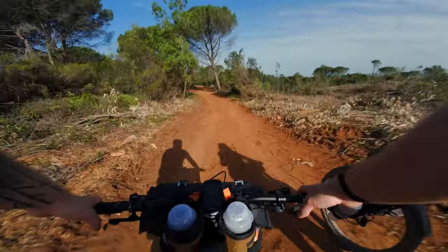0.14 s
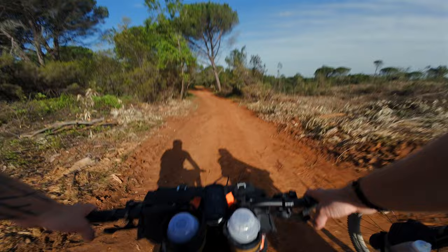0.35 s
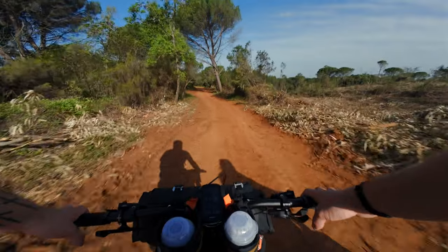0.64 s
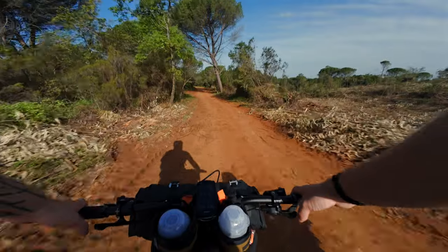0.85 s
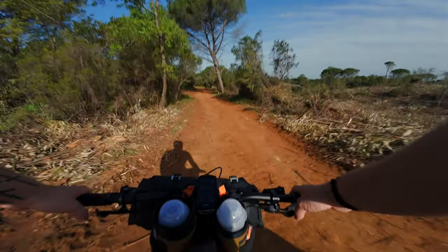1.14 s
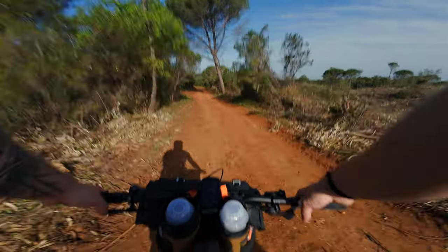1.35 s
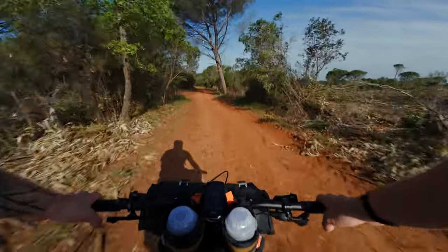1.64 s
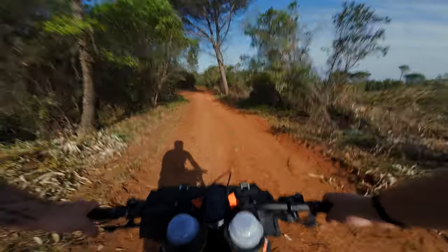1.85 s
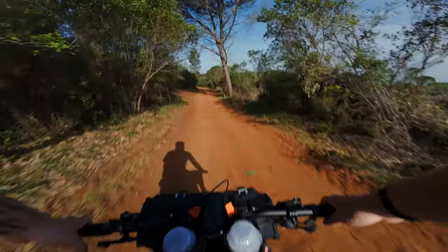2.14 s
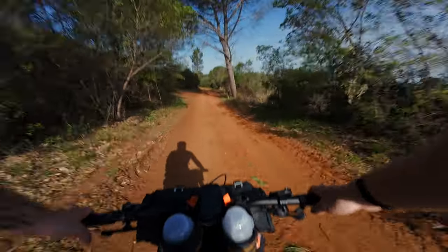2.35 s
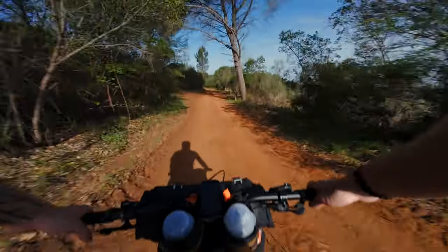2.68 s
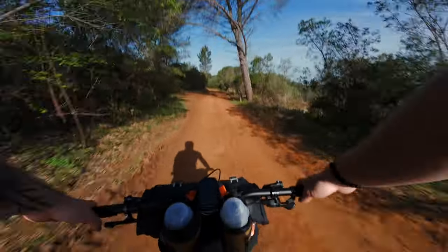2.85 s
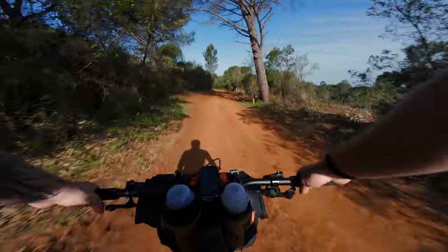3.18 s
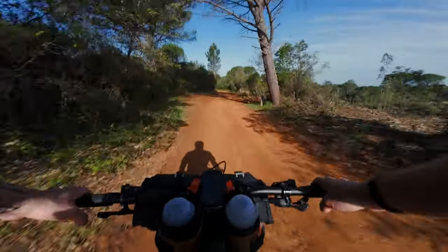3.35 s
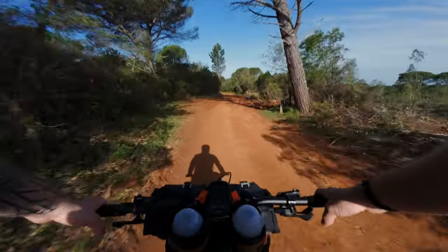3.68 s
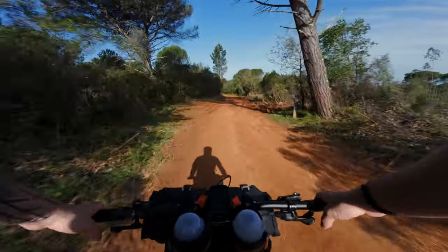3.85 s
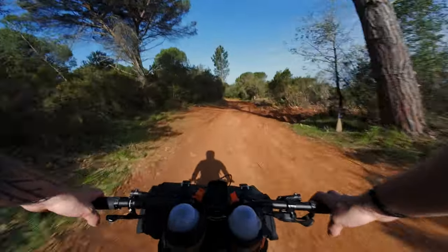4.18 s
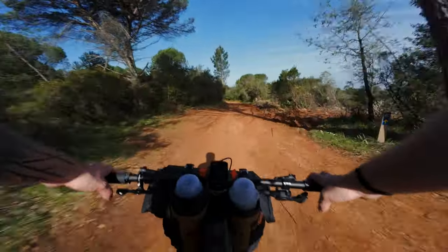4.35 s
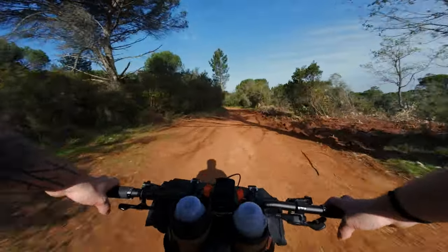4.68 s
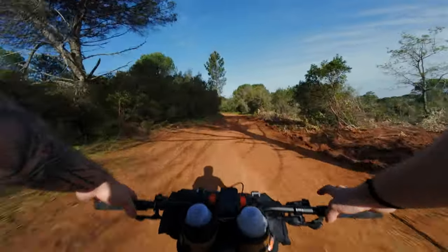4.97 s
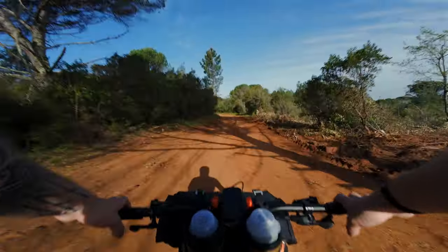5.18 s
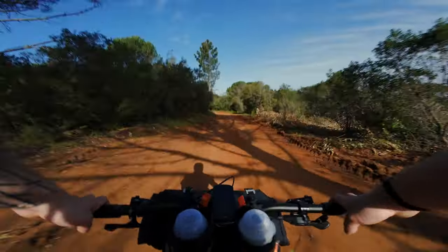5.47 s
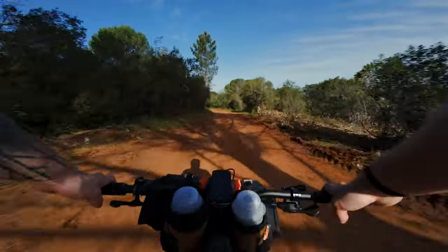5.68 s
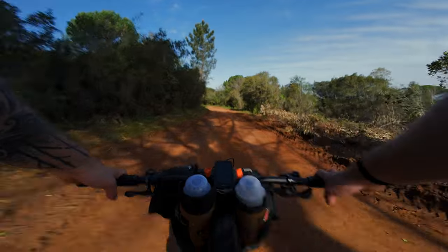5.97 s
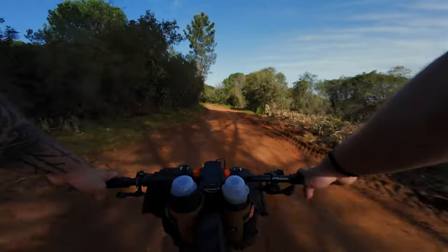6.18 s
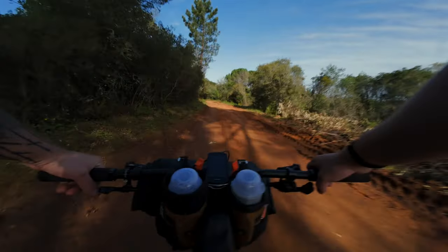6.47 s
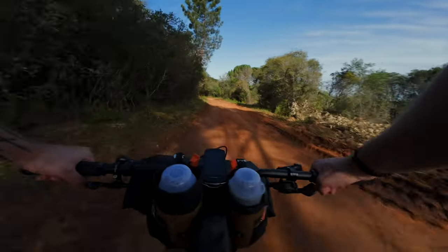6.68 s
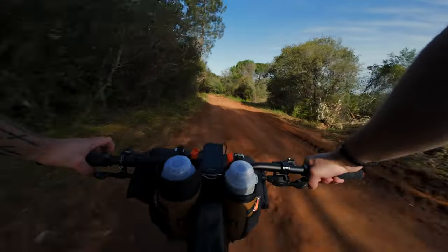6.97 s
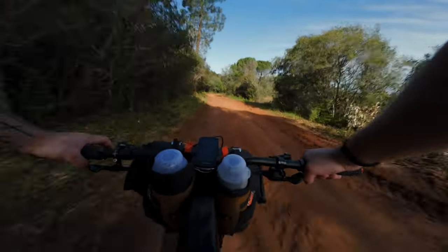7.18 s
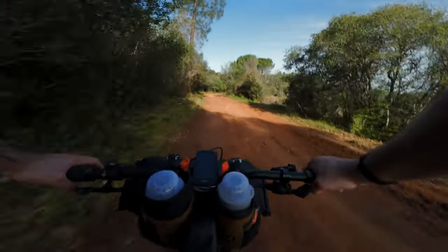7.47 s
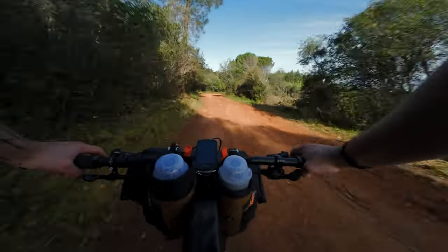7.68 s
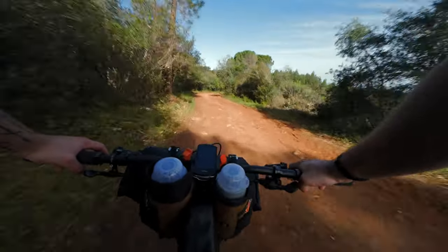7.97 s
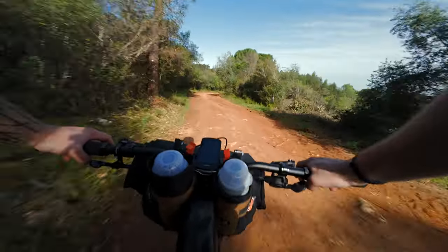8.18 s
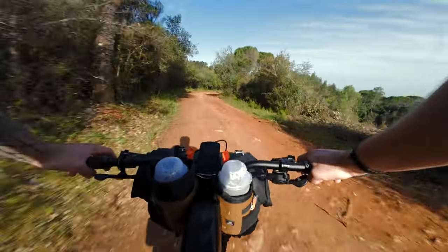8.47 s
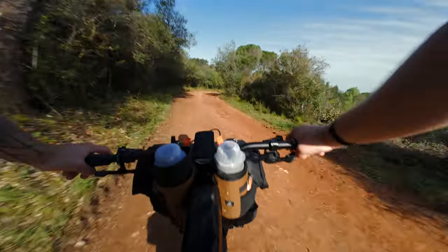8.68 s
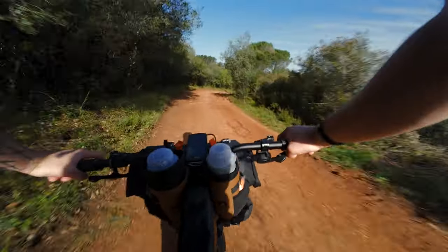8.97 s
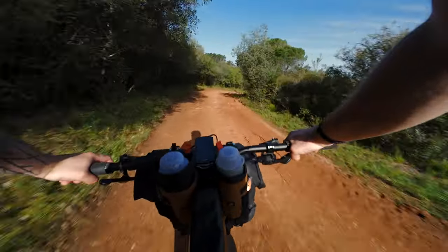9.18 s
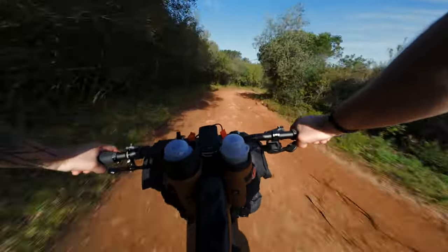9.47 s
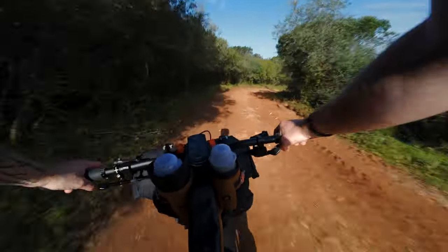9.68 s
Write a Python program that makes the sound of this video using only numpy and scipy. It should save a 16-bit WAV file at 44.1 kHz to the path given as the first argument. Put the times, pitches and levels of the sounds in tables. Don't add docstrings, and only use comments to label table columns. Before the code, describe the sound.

A loaded bicycle rumbles along a rough dirt track, grit crunching and small stones ticking off the frame while wind buffets the microphone.

```python
import sys
import numpy as np
from scipy import signal
from scipy.fft import rfft, irfft, next_fast_len
from scipy.io import wavfile
from scipy.ndimage import uniform_filter1d, map_coordinates

SR = 44100
rng = np.random.default_rng(int(sys.argv[2]) if len(sys.argv) > 2 else 0)


def level_to_linear(level):
    exponent = np.asarray(level, float) / 20
    return 10 ** exponent


def generate_wav(signal):
    frames = np.transpose(np.atleast_2d(signal))
    scaled = np.clip(frames, -1, 1) * 32767
    pcm = np.round(scaled).astype(np.int16)
    wavfile.write(sys.argv[1], SR, pcm)


N = 433503

# t/s, level/dB
WIND = [(0.0, -34), (0.15, -28.5), (0.75, -29), (1.15, -31), (1.45, -28.5), (1.7, -29.5), (2.65, -26.5),
        (2.9, -27.5), (3.42, -31), (4.2, -30), (4.62, -33.5), (5.61, -27), (6.1, -28.5), (7.4, -28.5),
        (7.61, -30.5), (8.1, -26), (8.6, -28), (9.83, -26.5)]
# f/Hz, level/dB
BUFFET = [(3, -70), (12, -2.5), (23, -6), (31, -5), (60, -9), (110, -20.5), (170, -24.5), (300, -24),
          (600, -114), (1500, -140)]
# t/s, peak level/dB, width/ms
GUSTS = [(0.177, -15, 8.7), (0.388, -10.5, 6.0), (0.424, -15, 15), (0.47, -14, 18), (0.726, -18, 11),
         (1.299, -14.5, 7.3), (1.403, -12.5, 8.6), (1.497, -10, 6.6), (1.567, -11.5, 9.3),
         (1.889, -12, 5.9), (1.924, -14, 20.0), (1.969, -14, 4.3), (2.07, -11.5, 6.8), (2.109, -15, 20),
         (2.15, -13, 5.4), (2.244, -9.5, 8.3), (2.275, -19, 15), (2.306, -12, 3.2), (2.38, -10.0, 11),
         (2.45, -15, 3.4), (2.528, -7.5, 8.6), (2.607, -12, 6.2), (2.695, -12.5, 5.4), (2.762, -14, 14),
         (2.838, -10.5, 9.1), (3.082, -14.0, 11), (3.16, -12, 11), (3.264, -10, 16), (3.36, -11.5, 10),
         (3.429, -13, 6.4), (3.528, -12.5, 7.9), (4.131, -14, 22), (5.475, -18, 16), (5.573, -17, 17),
         (5.64, -13, 20), (5.724, -12, 15), (5.752, -14, 9.6), (5.801, -22, 6.7), (5.991, -19, 9),
         (6.513, -13, 11), (6.734, -15, 6.3), (6.863, -13, 8.9), (6.941, -12.5, 13), (7.324, -16, 5.7),
         (7.408, -12, 11.5), (7.472, -15, 7.0), (7.928, -11, 16.0), (8.022, -13, 8.0), (8.115, -12, 16),
         (8.157, -8, 19), (8.205, -8, 11), (8.269, -17, 4.4), (8.354, -7.5, 13), (8.393, -14, 7.5),
         (8.821, -15, 6.7), (8.998, -21, 12), (9.155, -20, 6.5), (9.422, -17, 9.7), (9.592, -18, 10),
         (9.662, -20, 10)]
# t/s, depth level/dB, width/ms
SUCKS = [(0.407, -16, 6.2), (0.439, -15.0, 22), (0.707, -12, 12), (1.42, -14, 6.0), (1.464, -9, 16),
         (1.507, -8.5, 24), (1.903, -9.5, 3.5), (1.95, -10.5, 15), (2.086, -9.5, 4), (2.137, -9, 16),
         (2.258, -18, 7), (2.294, -13, 19), (2.544, -14, 4.1), (2.591, -10, 15), (2.711, -15.0, 5.0),
         (2.749, -11, 17.0), (3.284, -13, 9.3), (5.463, -13, 9.2), (5.561, -14, 18), (5.706, -13, 8.3),
         (5.742, -18, 5.5), (5.773, -14.0, 14), (6.536, -12, 5.6), (6.873, -9, 17), (7.004, -14.5, 7.6),
         (7.285, -8.5, 7.6), (7.451, -15, 9.5), (7.914, -12, 6.9), (8.081, -15, 8.9), (8.145, -16, 9.0),
         (8.193, -15, 6.2), (8.22, -13, 7.7), (8.369, -9, 11.0), (9.603, -13, 15), (9.646, -13.0, 8),
         (9.676, -17, 5.0)]
RISE_SHARE, SUCK_SHARE, SUCK_LEAD, SUCK_WIDE = 0.57, 0.075, 4.8, 1.8
VENT_HZ = 9

# t/s, loose grit level/dB, hard-ground drone level/dB
GROUND = [(0, -7, -36.5), (.8, -2, -42), (1.45, -1, -65), (2.3, 0.5, -43), (2.85, -1, -65),
          (3.26, 2.5, -42), (3.6, 0, -79), (4.57, 1, -39), (5.23, -0.5, -61), (5.85, 5.5, -34),
          (6.2, 1.5, -39), (6.6, 1.5, -36), (7.06, 4.5, -29.5), (7.5, 3, -31), (8.1, 6, -29.5),
          (8.6, 2.5, -36.5), (9.05, 0.5, -52), (9.83, 2, -41)]
# f/Hz, level/dB
CARCASS = [(90, -48), (140, -8), (250, -4.5), (400, -4.5), (550, -9.5), (700, -17), (1000, -21),
           (1300, -24.5), (2500, -46.5)]
# f/Hz, width/Hz, level/dB
CAVITY = [(208, 22, 0), (296, 30, -2), (435, 70, -8)]
# f/Hz, level/dB
GRIT = [(500, -7.5), (900, -3), (1300, -10), (1700, 0), (2150, -1), (2600, -5.5), (3200, -10), (3900, -11),
        (4150, -18.5), (4900, -12), (5400, -18.5), (7000, -25.5), (12000, -50)]
# f/Hz, width/Hz, level/dB
DRONE = [(1380, 230, 0), (1050, 200, -4), (780, 220, -5), (2000, 500, -3)]
# t/s, level/dB
BUMPS = [
    (1.2, -1.5),
    (3.61, 4),
    (4.75, 6),
    (4.9, 1.5),
    (7.34, 0.5),
    (7.46, -0.5),
    (7.63, 3),
    (7.93, 1.5),
    (8.7, 3),
    (9.0, 3),
]
BUMP_S = 0.032
HUM_DB, HUM_GROWS, CRUNCH_DB, CRUNCH_GROWS = -29.5, 0.4, -37.5, 0.55

# t/s, peak level/dB, ring f/Hz, rattle level/dB
PEBBLES = [(0.732, -26.5, 1920, -14), (0.8556, -26, 2160, 7), (1.0152, -17, 2090, -10),
           (1.5663, -25.5, 1740, 3), (1.783, -24, 1910, -9), (2.164, -19, 1580, -18),
           (3.0405, -19.5, 2050, -9), (3.0574, -22, 1720, -11), (3.159, -19, 1900, -9),
           (3.2195, -15, 1750, -6), (3.6865, -23.5, 2040, 3), (3.9754, -23.5, 2590, -10),
           (4.273, -20.5, 2230, -4), (4.598, -21, 2330, -17), (4.6288, -20, 2630, -15),
           (4.853, -24, 2150, -14), (5.0561, -13.5, 2300, -13), (5.0619, -9, 2150, -13),
           (5.5563, -5.5, 2100, -13), (8.5172, -6.5, 2050, -18), (5.1317, -21, 2010, -6),
           (5.3005, -16.5, 1620, -8), (5.684, -22, 2160, 2), (5.7262, -15, 2100, -14),
           (5.903, -20, 2170, -4), (8.14, -20, 2170, -8), (8.9379, -19, 1810, -5), (8.975, -24, 1660, -8),
           (9.0236, -27.5, 2160, 9.5), (9.5711, -22.5, 1810, -2)]
# t/s, peak level/dB, ring f/Hz, thud level/dB
STRAPS = [(1.1997, -37, 1610, 3), (1.814, -23, 1890, 3), (2.2155, -28, 1000, -4), (2.219, -19, 1750, 0),
          (2.3214, -25, 1050, 1), (3.1168, -26, 2000, 1.5), (3.6056, -15.5, 1810, 10.5),
          (3.7638, -18, 1830, 10), (4.7291, -11, 1500, -14), (4.7314, -13, 1450, -10),
          (5.464, -25.5, 1660, 15), (5.822, -22, 910, -5), (5.833, -14, 1660, 2), (5.847, -23, 940, -2.5),
          (7.749, -18, 1900, -4)]
# t/s, peak level/dB, ring f/Hz
CHIPS = [(0.4963, -17, 2540), (1.1209, -23, 1970), (1.5209, -17.5, 1720), (1.7325, -24, 1960),
         (2.0163, -22, 1950), (2.0572, -24.5, 966), (3.0768, -29, 947), (3.1756, -26, 1030),
         (3.193, -25, 1780), (3.234, -15, 1850), (3.3079, -18, 1900), (3.5623, -21, 2270),
         (3.5916, -17, 1890), (3.803, -18, 1810), (4.0721, -24, 2020), (4.2133, -19, 2220),
         (4.3287, -16, 2200), (4.6957, -19, 1880), (4.825, -17, 1680), (5.0868, -17, 1920),
         (5.429, -25, 1760), (5.5064, -20, 1560), (5.6248, -18, 1460), (5.9074, -21, 1130),
         (5.9534, -17, 1840), (6.0586, -21, 1440), (6.2615, -17, 1620), (6.331, -18, 2190),
         (6.3899, -25, 1630), (6.4313, -20, 1650), (6.8373, -18, 1450), (6.856, -22, 1950),
         (6.9346, -24, 1930), (7.0359, -24, 1300), (7.171, -25, 1150), (7.2457, -18, 2050),
         (7.449, -24, 1590), (7.5383, -25, 1340), (7.8211, -17, 1380), (7.854, -20, 1440),
         (8.1838, -22, 1320), (8.2227, -16, 2300), (8.454, -26, 1530), (8.6797, -20, 1390),
         (8.7181, -15, 1980), (8.8438, -20, 2200), (8.8827, -25, 1410), (9.2259, -18, 2180)]
# t/s, level/dB, length/s
SHAKES = [(0.3, -28.5, 0.14), (0.445, -23.5, 0.016), (1.19, -25, 0.019), (1.357, -34, 0.021),
          (2.149, -23.5, 0.039), (2.318, -19.5, 0.032), (3.044, -24, 0.048), (3.109, -21.5, 0.14),
          (3.589, -24, 0.029), (3.74, -23, 0.072), (4.23, -26.5, 0.22), (5.81, -22, 0.056),
          (7.214, -24.5, 0.11)]
# f/Hz, level/dB
RATTLE = [(150, -54), (350, 11), (800, -1), (2000, -0.5), (3500, -11.5), (5000, -27.5), (9000, -27)]
PEBBLE_THUD_DB, STRAP_RATTLE_DB = -33, -10
CHIP_DB, CHIP_RATTLE_DB = -7, -3.5
SMALL_PER_S, SMALL_DB, SMALL_SPREAD_DB = 4, -32, 3
SMALL_HZ, SMALL_OCTAVES = 2100, 0.25
RING_CYCLES = 11.5
OVERTONE, OVERTONE_DB = 1.25, -13
TAIL_DB, TAIL_LONGER = -14, 3.5

# t/s, level/dB, contact/ms (negative: pull first)
BLOWS = [(2.2163, -2.5, 0.25), (0.8562, -12, .1), (1.0155, -13, .09), (4.1, -17, 0.48), (1.207, -12, 0.8),
         (5.848, -15, .3), (3.1175, -14, .09), (3.1615, -14, .1), (4.7293, -4, .27), (4.7313, -4, -.22),
         (1.567, -14, .1), (5.464, -15, .12), (9.5715, -14, .1), (5.7265, -14, .09), (3.0585, -13, .09),
         (5.8335, -12, .12), (5.823, -15, .2), (2.33, -16, .2)]
# t/s, level/dB, f/Hz, t60/s
BODY = [(4.7282, -10, 270, .04), (4.7286, -13, 720, .012), (4.7283, -22, 200, .05), (2.2155, -19, 420, .02),
        (1.2012, -21, 430, .04), (8.5172, -21, 900, .008), (5.0618, -21, 1050, .01), (5.832, -16, 520, .02),
        (5.822, -19, 800, .012), (3.7635, -19, 450, .025), (3.689, -21, 500, .02)]
# t/s, peak level/dB, dull part level/dB
TICKS = [(0.175, -13.5, -8), (0.4983, -32, -12), (2.1645, -20, -1), (2.323, -32, 15), (2.329, -34, 12),
         (2.34, -34, 11), (3.069, -38, 10), (3.117, -42, 6), (3.146, -39, 8), (3.17, -31, 13),
         (3.235, -40, 6), (3.605, -30, 14), (3.761, -30, 15), (3.057, -21, 7), (3.16, -17.5, 2),
         (3.2164, -14, -6), (3.563, -14, -5), (5.536, -18, -4), (5.7259, -29, -3), (5.776, -15, -18),
         (5.789, -34, 10), (5.8225, -34, 11), (5.833, -33, 12), (5.848, -32, 11), (5.861, -26, 1),
         (8.5166, -23, -1), (5.994, -13, -10), (6.986, -36, -10), (7.0744, -19, -4), (7.093, -11.5, -12),
         (7.7303, -19, -16), (8.7291, -23, -7), (8.749, -21, 1), (8.9765, -22, -1), (9.177, -24, -6),
         (9.5756, -22, -13)]

# f/Hz, level/dB
HISS = [(3000, -25.5), (5500, -7), (7000, -17.5), (8000, -10.5), (9300, -8.5), (11500, -7), (12300, -4),
        (13700, -19), (16000, -6.5)]
# f/Hz, width/Hz, level/dB
PORT = [(10200, 600, 0), (13000, 460, -3)]
# f/Hz, level/dB
PASSING = [(1500, -35), (2500, 15), (4000, 7), (6000, 6.5), (7200, -3), (8200, 10), (9500, -7),
           (16000, -23)]
SAND_DB, LULL_S, LULL_WIDE_S, LULL_DB = -42, 8.92, .07, -4.5
NEIGHBOUR_DB, FALLS_BACK_DB_PER_S, NEIGHBOUR_SAND_DB = -35.5, 12.5, -33

# f/Hz, share 0-1
ALIKE = [(200, 1), (800, .996), (1300, .88), (2500, .8), (3900, .5), (4600, .6), (5500, .8), (6200, .7),
         (7000, .35), (8300, .22), (10200, .42), (12000, .15)]
# f/Hz, level/dB
SHADOW = [(800, 1.5), (1200, 2), (2000, 2), (3200, 4.5), (4500, 2.5), (5500, 0), (6200, -5), (7000, -8.5),
          (8500, -11), (10000, -15.5), (11700, -42), (13000, -37), (16000, -22)]
# f/Hz, lead/rad
LAG = [(0, 0), (900, .03), (2150, .65), (3620, 1.6), (4220, 2.2), (5340, 2.9), (7670, 3), (10500, 4.4),
       (13100, 4.5), (16600, 6.7)]

LETS_GO = [
    0,
    .62,
    .84,
    1.22,
    1.82,
    3.24,
    4.73,
    4.88,
]
# from t/s, to t/s, f/Hz
CLAMPS = [(3.46, 3.51, 4050), (3.66, 3.69, 3800), (4.06, 4.2, 2700), (5.8, 5.93, 2850), (5.93, 6.28, 4050),
          (6.39, 6.93, 4050), (7.08, 7.1, 3400), (7.51, 7.63, 3950), (8.5, 8.69, 4050), (8.8, 9.9, 4050),
          (5.6, 9.9, 1700)]
GUARD_HZ, OPEN_SHARE, CLOSE_S, HUNTS_HZ = 1400, .8, .065, 110
KEEP_SHARE = 0.35
# from t/s, to t/s, level/dB
MASKING = [(0, .88, -6), (1.34, 1.56, 4), (2.3, 2.75, 3), (3.24, 3.37, 10), (3.75, 3.95, 5), (5.4, 6.25, 0),
           (6.25, 6.4, 4), (6.45, 7.09, -2.5), (7.12, 7.4, 11), (7.4, 7.5, 6), (8.05, 8.2, 6),
           (8.8, 8.97, 4.5), (9.3, 9.55, 3), (8.55, 9.3, -.5)]
USUAL_MASKING_DB, MASKING_WHIM_DB = .5, 3.5
TOP_HZ = 15720


def unit(x):
    return x / np.sqrt(np.mean(x ** 2) + 1e-20)


def along(points, hz):
    f, v = np.transpose(points)
    return np.interp(np.log(hz + 1), np.log(f + 1), v)


def curves(rows):
    s, *cols = np.transpose(rows)
    return [np.interp(np.arange(N) / SR, s, c) for c in cols]


def spans(rows, t, usual):
    return np.select([(t >= a) & (t < b) for a, b, _ in rows], [v for *_, v in rows], usual)


def wobble(rate):
    return map_coordinates(rng.standard_normal(int(N * rate / SR) + 4), [np.arange(N) * rate / SR])


def filtered(x, response):
    m = next_fast_len(N + 8192)
    return irfft(rfft(x, m) * response(np.fft.rfftfreq(m, 1 / SR)), m)[..., :N]


def coloured(x, points):
    return unit(filtered(x, lambda hz: level_to_linear(along(points, hz))))


def modes(table, hz):
    return sum(level_to_linear(db) * 1j * hz * w / (c * c - hz * hz + 1j * hz * w) for c, w, db in table)


def patchy(depth_db):
    z = signal.stft(rng.standard_normal((2, N)), nperseg=512)[2]
    field = uniform_filter1d(rng.standard_normal(z.shape[1:]), size=6, axis=0)
    field = uniform_filter1d(field, size=8, axis=1)
    return signal.istft(z * level_to_linear(depth_db * unit(field)), nperseg=512)[1][:, :N]


def grains(rate, spread_db, life_s):
    when, size = rng.random((2, N))
    starts = (when < rate / SR) * np.maximum(size, .04) ** (-spread_db * np.log(10) / 20)
    gate = signal.lfilter([1], [1, -np.exp(-1 / (life_s * SR))], starts)
    return unit(gate * rng.standard_normal((2, N)))


def turbulence():
    eddies = unit(filtered(rng.standard_normal(N), lambda hz: 1 / (1 + (hz / 45) ** 2)))
    skewed = np.exp(0.12 * eddies)
    skewed = (skewed - skewed.mean()) * signal.windows.tukey(N, .01)
    return unit(filtered(skewed, lambda hz: (1 + (hz / 45) ** 2) * level_to_linear(along(BUFFET, hz))))


def wind():
    slaps, t = np.zeros(N + SR), np.arange(-4000, 4000) / SR
    for s, db, width_ms in GUSTS:
        u = t / (width_ms / 1000 * 0.62)
        push = np.exp(-(u / np.where(u < 0, RISE_SHARE, 1)) ** 2)
        push -= SUCK_SHARE * np.exp(-((u + SUCK_LEAD) / SUCK_WIDE) ** 2)
        push -= np.exp(-(u / 13.0) ** 2) / 5.5
        slaps[round(s * SR):][:len(t)] += level_to_linear(db + 2.5) * push
    for s, db, width_ms in SUCKS:
        pull = np.exp(-(t / (width_ms / 1000 * 0.52)) ** 2)
        slaps[round(s * SR):][:len(t)] -= level_to_linear(db + 2.0) * pull
    slaps = slaps[len(t) // 2:][:N]
    vented = filtered(slaps, lambda hz: hz ** 2 / (hz ** 2 + VENT_HZ ** 2))
    return level_to_linear(curves(WIND)[0] + 3.5) * turbulence() + vented


def tyres():
    grit_db, drone_db = curves(GROUND)
    booms_db = sum(db * np.exp(-((np.arange(N) / SR - s) / BUMP_S) ** 2) for s, db in BUMPS)
    jolt, ground = wobble(16), unit(patchy(1.43))

    hum = unit(filtered(ground, lambda hz: level_to_linear(along(CARCASS, hz)) + abs(modes(CAVITY, hz)) ** 2.93))
    hum_db = HUM_DB + HUM_GROWS * grit_db + booms_db + 0.5 * jolt

    fine = level_to_linear(-3.5) * grains(300, 1.5, 0.0015)
    coarse = level_to_linear(-7.5 + 3.75 * wobble(25)) * grains(120, 2.5, 0.001)
    crunch = coloured(unit(patchy(1.95)) + fine + coarse, GRIT)
    crunch_db = CRUNCH_DB + CRUNCH_GROWS * grit_db + 1.3 * jolt + 0.8 * wobble(7.9)

    drone = unit(filtered(ground, lambda hz: modes(DRONE, hz) ** 2))
    return level_to_linear(hum_db) * hum + level_to_linear(crunch_db) * crunch + level_to_linear(drone_db - 5.5) * drone


def contacts():
    count = round(SMALL_PER_S * N / SR)
    when, luck = rng.random(count) * N / SR, rng.standard_normal((count, 2))
    small = [(s, SMALL_DB + SMALL_SPREAD_DB * np.tanh(a), SMALL_HZ * 2 ** (SMALL_OCTAVES * b), -9, -2.5)
             for s, (a, b) in zip(when, luck)]
    pebbles = [(s, db, hz, PEBBLE_THUD_DB - db, rattle_db) for s, db, hz, rattle_db in PEBBLES]
    chips = [(s, db + CHIP_DB, hz, -12, CHIP_RATTLE_DB) for s, db, hz in CHIPS]
    straps = [(*row, STRAP_RATTLE_DB) for row in STRAPS]
    return sorted(pebbles + chips + straps) + small


def knocks():
    out, loose, t = np.zeros((2, N + SR)), np.zeros((2, N + SR)), np.arange(2600) / SR
    rise = (1 - np.exp(-t / 0.00042)) ** 2
    for s, db, hz, thud_db, rattle_db in contacts():
        t60 = RING_CYCLES / hz
        luck, hash_ = rng.random(2), rng.standard_normal((2, len(t)))
        cycles = hz * (t + .00015 * (1 - np.exp(-t / 0.0008)))
        turns = 2 * np.pi * (cycles + [[0], [luck[0] / 4]])
        tones = np.sin(turns) + level_to_linear(OVERTONE_DB - 60 * t / t60) * np.sin(OVERTONE * turns)
        decay = level_to_linear(-60 * t / t60) + level_to_linear(TAIL_DB - 60 * t / (TAIL_LONGER * t60))
        ring = tones * decay * rise
        thud_hz = 380 * (0.65 + 0.44 * luck[1])
        thud = np.sin(2 * np.pi * thud_hz * t) * level_to_linear(thud_db - 4.0 - 60 * t / 0.027) * rise
        rattle = level_to_linear(db + rattle_db - 60 * t / (5.4 * t60)) * rise * hash_
        start = round(s * SR)
        out[:, start:][:, :len(t)] += level_to_linear(db + 5.5) * ring + level_to_linear(db) * thud
        loose[:, start:][:, :len(t)] += rattle
    clatter, shaken = grains(900, 1.7, 0.0015), np.zeros(N)
    for s, db, length in SHAKES:
        count = round(length * SR)
        shaken[round(s * SR):][:count] += level_to_linear(db) * np.hanning(count) ** .5
    rattling = loose[:, :N] + level_to_linear(-4.5) * shaken * clatter
    return out[:, :N] + filtered(rattling, lambda hz: level_to_linear(6.5 + along(RATTLE, hz)))


def blows():
    time, flat, near = np.arange(N) / SR, np.zeros(N), np.arange(-200, 200)
    for s, db, ms in BLOWS:
        at = round(s * SR) + near
        contact = (at / SR - s) / (ms / 1000)
        flat[at] -= level_to_linear(db) * contact * np.exp(-contact ** 2)
    for s, db, hz, t60 in BODY:
        since = np.clip(time - s, 0, 1)
        flat += level_to_linear(db - 60 * since / t60) * np.sin(2 * np.pi * hz * since)
    return flat


def ticks():
    bright, dull, t = np.zeros((2, N + SR)), np.zeros((2, N + SR)), np.arange(900) / SR
    for s, db, dull_db in TICKS:
        crack = level_to_linear(db - 60 * t / 0.035) * (1 - np.exp(-t / 0.00034)) * rng.standard_normal((2, len(t)))
        bright[:, round(s * SR):][:, :len(t)] += crack
        dull[:, round(s * SR):][:, :len(t)] += level_to_linear(dull_db) * crack
    top = filtered(bright[:, :N], lambda hz: level_to_linear(along(HISS, hz)) + level_to_linear(-17.0) * modes(PORT, hz))
    return top + filtered(dull[:, :N], lambda hz: level_to_linear(-6.0) * modes([(4000, 3600, 0)], hz) ** 2)


def sand():
    time = np.arange(N) / SR
    spray = unit(patchy(1.3)) + level_to_linear(-20.0) * grains(140, 5.0, 0.0015)
    own = unit(filtered(spray, lambda hz: level_to_linear(along(HISS, hz)) + level_to_linear(-3.0) * abs(modes(PORT, hz))))
    other = coloured(spray[:, ::-1], PASSING)
    drift_db = .6 * wobble(6) + LULL_DB * np.exp(-((time - LULL_S) / LULL_WIDE_S) ** 2)
    behind_db = -FALLS_BACK_DB_PER_S * time
    both = np.hypot(level_to_linear(SAND_DB + curves(GROUND)[0]), level_to_linear(NEIGHBOUR_SAND_DB + behind_db))
    return level_to_linear(drift_db) * both * own + level_to_linear(NEIGHBOUR_DB + behind_db) * other


def ports(direct, stray):
    def paths(hz):
        like = np.clip(along(ALIKE, hz), 0, 1)
        lag = np.exp(-1j * np.interp(hz, *np.transpose(LAG)))
        path = level_to_linear(along(SHADOW, hz) - SHADOW[0][1]) * lag
        return path * [like, np.sqrt(1 - like ** 2)]

    right = filtered(np.array([direct, stray]), paths)
    return np.array([direct, right.sum(axis=0)])


def scene():
    return ports(*(tyres() + knocks() + blows() + ticks() + sand())) + wind()


def guard(t):
    slack = sum(np.exp(-np.abs(t - s) / CLOSE_S) for s in LETS_GO)
    corner = spans(CLAMPS, t, GUARD_HZ * (1 - OPEN_SHARE * np.minimum(slack, 1)))
    return corner + HUNTS_HZ * np.repeat(rng.standard_normal(len(t)), 4)[:len(t)]


def band_power(z, k=4):
    level = np.abs(z).reshape(-1, k, z.shape[1]).mean(axis=1)
    return np.repeat(uniform_filter1d(level ** 2, size=3), k, axis=0)


def band_limit(x):
    return signal.sosfilt(signal.butter(12, 17040, fs=SR, output="sos"), x)


def record(dry):
    hz, t, (left, right) = signal.stft(dry, SR, nperseg=1024)
    hz, left, right = hz[:-1, None], left[:-1], right[:-1]

    usual = uniform_filter1d(band_power(right), size=12)
    right = right * ((np.abs(right) ** 2 > .45 * usual) | (hz < 6000))
    mid, side = left + right, left - right

    whim = np.repeat(np.repeat(rng.standard_normal((64, len(t))), 8, axis=0), 4, axis=1)[:, :len(t)]
    hidden_db = spans(MASKING, t, USUAL_MASKING_DB) + MASKING_WHIM_DB * whim - 15.6
    hidden = level_to_linear(hidden_db) * band_power(side, 8)
    mid = mid * ((band_power(mid, 8) > hidden) | (hz < 4100) | (hz > 6300))

    wide = hz > guard(t)
    side_power = uniform_filter1d(band_power(side), size=9)
    kept = side_power / (uniform_filter1d(band_power(mid), size=9) + 1e-20)
    mid, side = mid * np.sqrt(1 + abs(KEEP_SHARE * kept) * ~wide), side * wide

    pair = np.array([mid + side, mid - side]) / 2 * (hz < TOP_HZ)
    pair = np.pad(pair, ((0, 0), (0, 1), (0, 0)))
    mix = signal.istft(pair, SR, nperseg=1024)[1][:, :N]
    return band_limit(mix)


dry = scene()
out = record(dry)
generate_wav(out)
```